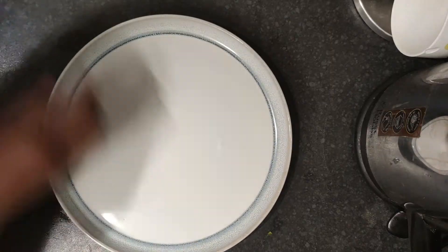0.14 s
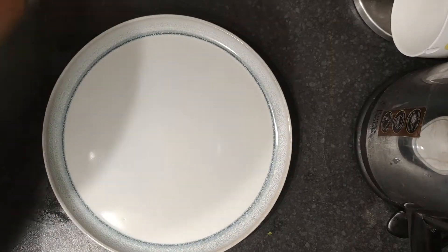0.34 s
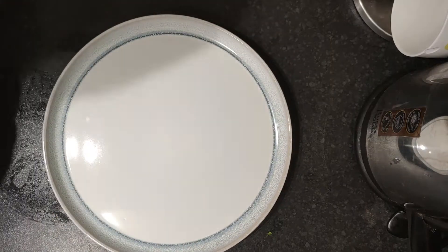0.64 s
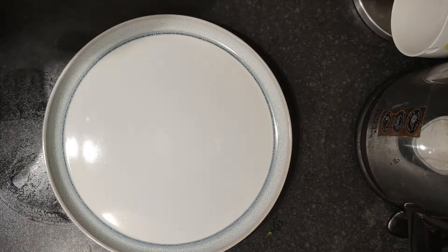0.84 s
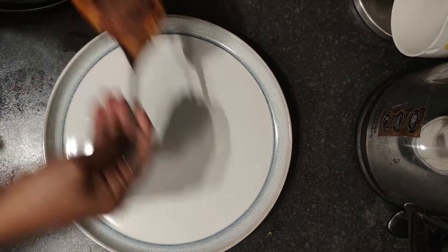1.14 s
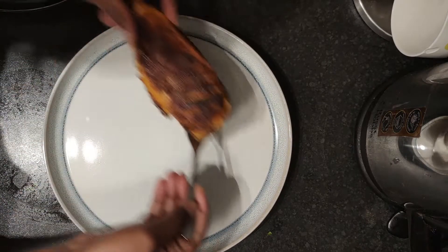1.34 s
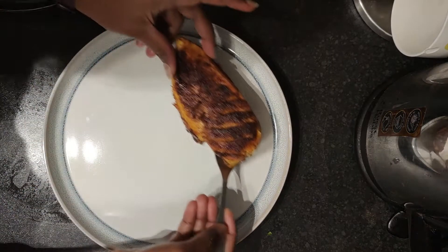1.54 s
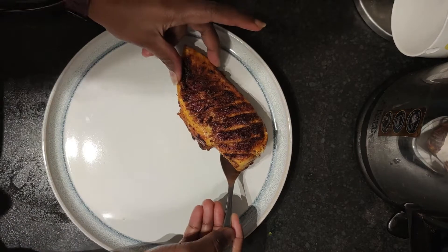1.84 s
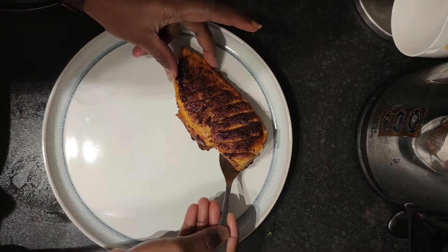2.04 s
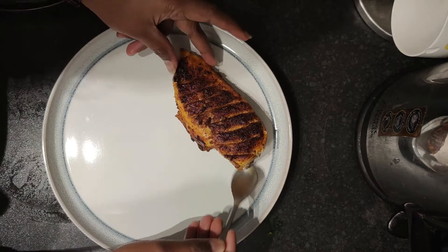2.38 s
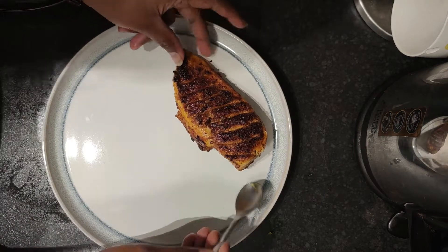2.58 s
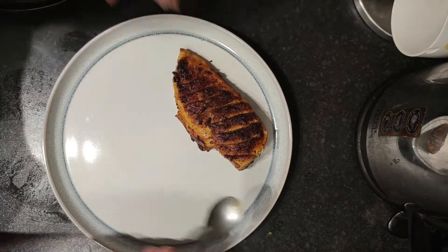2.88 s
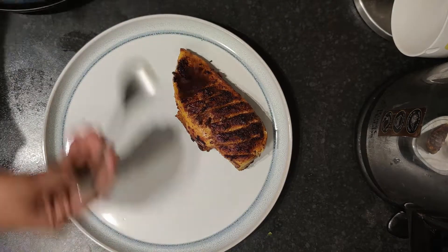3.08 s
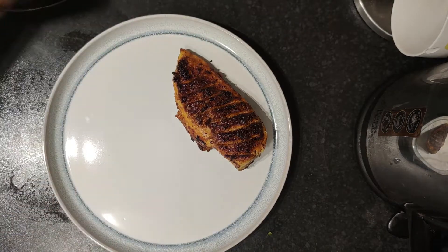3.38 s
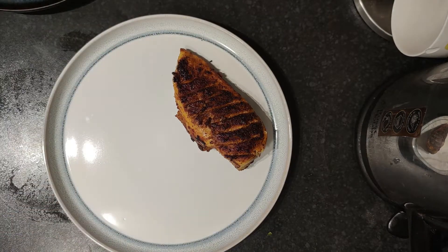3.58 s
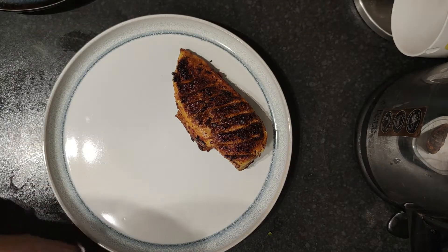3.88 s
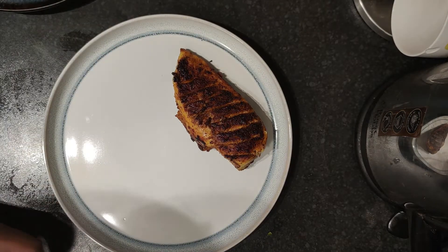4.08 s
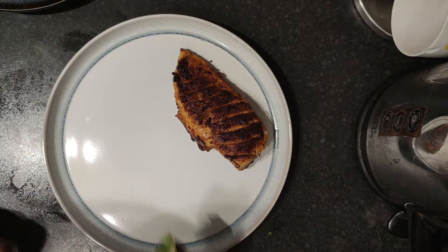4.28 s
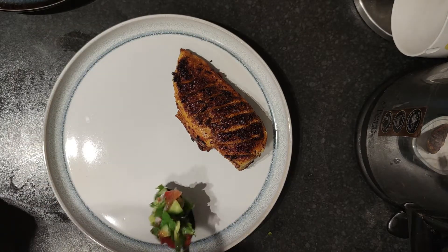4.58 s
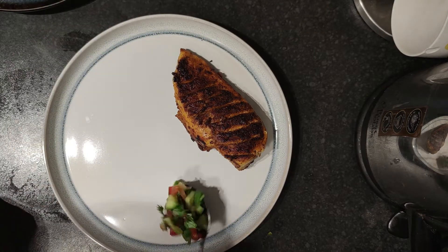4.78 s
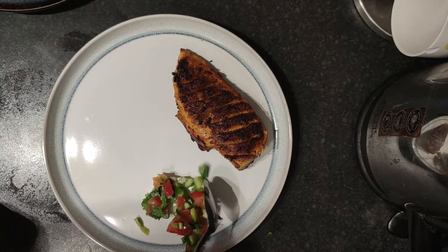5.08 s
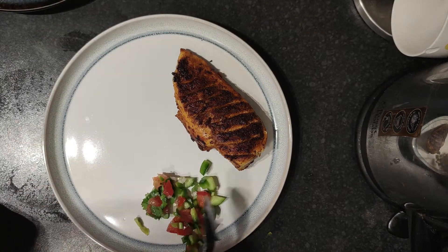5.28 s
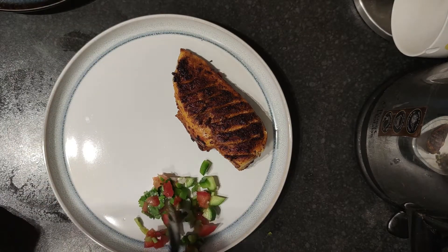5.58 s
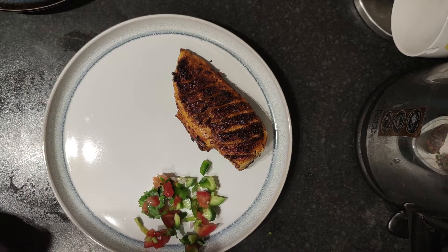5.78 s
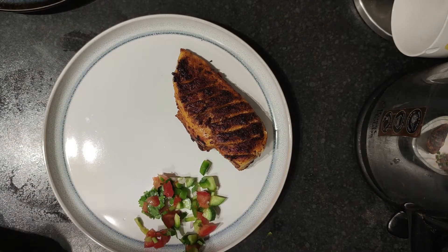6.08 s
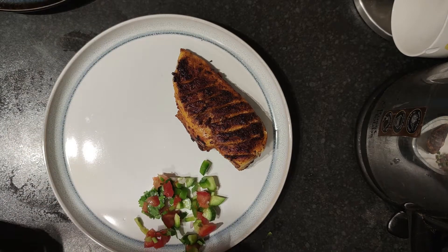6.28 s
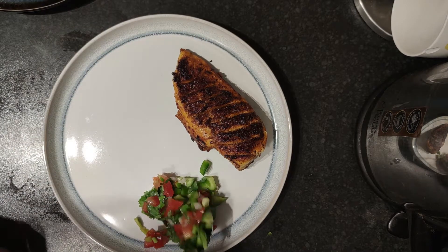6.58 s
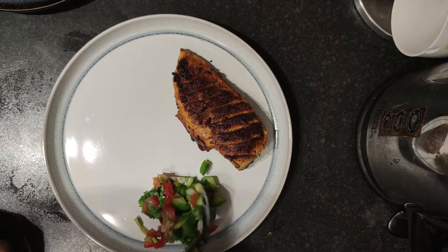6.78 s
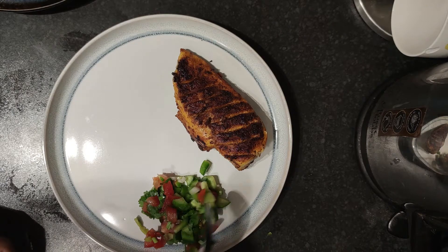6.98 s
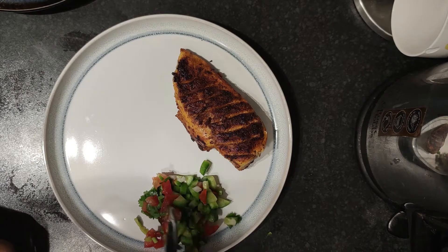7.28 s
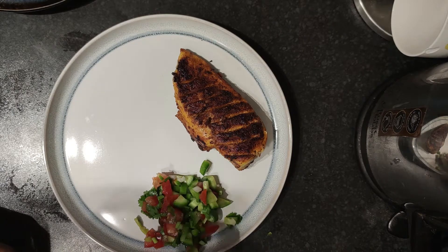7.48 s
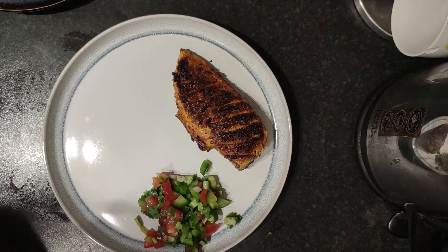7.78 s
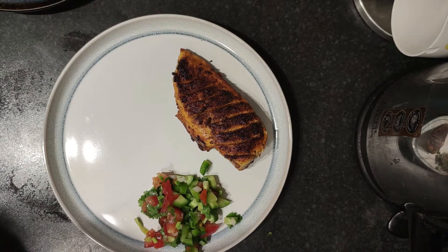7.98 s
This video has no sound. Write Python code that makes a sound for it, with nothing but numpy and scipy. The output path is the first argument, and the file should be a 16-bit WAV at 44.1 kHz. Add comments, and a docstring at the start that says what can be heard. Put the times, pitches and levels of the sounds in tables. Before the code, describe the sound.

A quiet kitchen is heard close up, with a steady low rumble and faint hiss. During the first second, two soft swishes slide across a stone counter, with light knocks and a small squeaky scuff near 0.4 seconds. At 1.8 seconds a spoon clinks clearly on a ceramic plate, slightly to the left, ringing briefly. A tiny touch and a faint scrape follow around 2.3 seconds. At 3.6 seconds a steel utensil is put down with a dull thump and a bright rattling ring that stops short at 3.9. From about 4 to 8 seconds, chopped salad leaves the spoon in faint wet ticks, soft pats and rustles, clearest around 5 to 5.5 and 6.2 seconds, with a few muted spoon touches on the plate. At 8.1 seconds metal tongs clatter with a low thump and a sharp ring, the loudest sound.

```python
"""Soft knocks and the swish of things sliding on a stone counter, close by in a quiet kitchen.
A spoon clinks on a ceramic plate, a steel utensil is put down, chopped salad drops from the spoon
with small wet ticks, and metal tongs clatter. Each impact on ceramic or steel excites a brief crack
and long-ringing modes; sliding makes friction noise. Two microphone ports hear it over a low rumble."""
import sys
import numpy as np
from scipy import signal
from scipy.fft import rfft, irfft, next_fast_len
from scipy.io import wavfile
from scipy.ndimage import uniform_filter1d

SR = 44100
rng = np.random.default_rng(int(sys.argv[2]) if len(sys.argv) > 2 else 0)


def digitize_waveform(pressure):
    """Quantize a signal to 16-bit integers and store it at the path in sys.argv[1].

    Rows of a 2-D input are taken as channels; values are limited to [-1, 1].
    """
    field = np.atleast_2d(pressure).T
    bounded = np.clip(field, -1, 1)
    quanta = np.round(bounded * 32767).astype(np.int16)
    wavfile.write(sys.argv[1], SR, quanta)


N = 358974

# Spectrum of broad friction noise. Each row: frequency in Hz, relative density in dB.
FRICTION_SPECTRUM = [(100, 2), (500, -1), (1800, 2), (3500, 2), (6000, -4), (8500, -1), (11000, -10.5),
                     (15500, -13)]


def plate():
    """Impact excitation: the spoon strikes the ceramic plate, then touches it lightly."""
    # Each row: frequency in Hz, relative level in dB, nominal t60 in seconds.
    modes = [(800, -48, 0.34), (870, -49, 0.31), (1620, -39, 0.25), (2471, -37, 0.31), (2530, -39, 0.3),
             (2870, -38, 0.29), (2950, -43, 0.35), (3709, -39, 0.32), (3800, -43, 0.28), (4240, -37, 0.25),
             (4400, -48, 0.31), (4743, -45, 0.27), (5319, -52, 0.35), (5588, -48, 0.26), (5986, -49, 0.28),
             (6428, -49, 0.28), (6740, -55, 0.33), (7850, -54, 0.26), (8236, -54, 0.27), (8355, -51, 0.33),
             (8520, -59, 0.35), (9152, -54, 0.3), (10400, -54, 0.21), (12100, -55, 0.28)]
    # Each row: start in seconds, strength in dB, share that goes into ringing in dB.
    hits = [(1.8151, 5, -5), (1.8172, 0, -16), (2.231, -34, 3.5)]
    # Each row: frequency in Hz, relative density in dB.
    crack_spectrum = [(100, -20), (550, -18), (850, 11.5), (1250, -12), (2900, 7.5), (4200, 10),
                      (5200, 1.5), (7000, -3), (7900, 7), (9300, -7.5), (12000, -12), (15500, -25)]
    crack = reverberate(cracks(hits, crack_spectrum, level_db=-30, t60=0.028), wet_db=-5.5, pan_db=11.5)
    return crack + ringing(hits, modes, level_db=1, t60_scale=0.94, flutter=1)


def utensil():
    """Rebound: a steel utensil lands, rattles and vibrates freely until its ring breaks off."""
    # Each row: frequency in Hz, relative level in dB, nominal t60 in seconds.
    modes = [(464, -40, 0.41), (1400, -40, 0.4), (1462, -36, 0.35), (1986, -47, 0.44), (2229, -38, 0.41),
             (2275, -36, 0.46), (2353, -30, 0.42), (2385, -30, 0.4), (2445, -34, 0.39), (2814, -50, 0.42),
             (2998, -52, 0.39), (3704, -47, 0.44), (4199, -51, 0.4), (4576, -41, 0.34), (4651, -34, 0.35),
             (4722, -37, 0.39), (4813, -46, 0.37), (5080, -49, 0.38), (6228, -40, 0.37), (6300, -43, 0.36),
             (6460, -44, 0.37), (8080, -47, 0.27), (8689, -61, 0.37), (8920, -49, 0.25), (9200, -48, 0.26),
             (9950, -56, 0.36), (12160, -62, 0.36), (13000, -61, 0.34), (14850, -62, 0.38)]
    # Each row: start in seconds, strength in dB, share that goes into ringing in dB.
    hits = [(3.6411, 6.5, 0), (3.648, -2, -2.5), (3.6545, 9, -18), (3.727, -37, -5)]
    # Each row: frequency in Hz, relative density in dB.
    crack_spectrum = [(50, -21.5), (140, -2), (260, -7), (480, -8.5), (1000, -4), (2300, 1), (3200, -6.5),
                      (4600, 5), (5500, -21), (6300, 5), (7500, -7.5), (8200, -7.5), (11000, -15.5),
                      (15500, -8)]
    crack = reverberate(cracks(hits, crack_spectrum, level_db=-34, t60=0.056), wet_db=-5, pan_db=2.5)
    ring = ringing(hits, modes, level_db=-4.5, t60_scale=0.94, flutter=1)
    stop_s = 3.897
    return (crack + ring) * np.clip((stop_s - np.arange(N) / SR) / 0.0014, 0, 1)


def tongs():
    """Repeated impact: two steel arms clatter, each contact exciting the same modes again."""
    # Each row: frequency in Hz, relative level in dB, t60 in seconds.
    modes = [(1440, -28, 0.33), (1530, -38, 0.4), (1700, -45, 0.29), (2067, -26, 0.28), (2450, -24, 0.17),
             (2560, -33, 0.4), (2800, -39, 0.4), (3472, -39, 0.4), (3740, -30, 0.33), (4245, -32, 0.39),
             (5200, -37, 0.4), (6000, -40, 0.27), (6260, -31, 0.4), (6790, -26, 0.17), (7686, -32, 0.4),
             (7722, -33, 0.4), (8100, -36, 0.13), (8965, -39, 0.4), (9574, -24, 0.09), (10645, -22, 0.09),
             (12790, -35, 0.2), (14180, -40, 0.35), (14650, -28, 0.13)]
    # Each row: start in seconds, strength in dB, share that goes into ringing in dB.
    hits = [(8.0912, 5.5, -19), (8.093, -1, -0.5), (8.0975, -13, -17), (8.1165, -3.5, -12),
            (8.119, 4.5, -28), (8.1375, -12, -8)]
    # Each row: frequency in Hz, relative density in dB.
    crack_spectrum = [(50, -17), (150, -6), (300, -37), (700, -5), (1000, -12.5), (1500, 2.5), (2600, 6),
                      (4000, 9), (4800, 0), (6800, 9.5), (8400, -5), (11000, -16), (15500, 1.5)]
    crack = reverberate(cracks(hits, crack_spectrum, level_db=-24, t60=0.072), wet_db=-6.5, pan_db=6.5)
    return crack + ringing(hits, modes, level_db=0, t60_scale=1, flutter=0.45)


def cracks(hits, spectrum, level_db, t60):
    """Modal overlap: the dense, fast-dying modes of each contact merge into a burst of noise."""
    out, t = np.zeros((2, N)), np.arange(SR // 5) / SR
    attack = 1 - np.exp(-t / 0.0003)
    for start, strength_db, _ in hits:
        burst = at_ports(np.array([noise(spectrum, len(t)) for port in range(2)]))
        add(out, start, gain_of(strength_db + level_db) * attack * decay(t, t60) * burst)
    return out


def ringing(hits, modes, level_db, t60_scale, flutter):
    """Free vibration: each contact adds energy to the long modes, and reflections make them flutter."""
    out, start = np.zeros((2, N)), hits[0][0]
    t = np.arange(start, hits[-1][0] + 0.35, 1 / SR)
    for hz, db, t60 in modes:
        energy = np.zeros(len(t))
        for hit_s, strength_db, share_db in hits:
            envelope = (t > hit_s) * decay(abs(t - hit_s), t60 * t60_scale)
            energy += (gain_of(strength_db + share_db) * envelope) ** 2
        amplitude = np.sqrt(np.maximum(uniform_filter1d(energy, 16), 0))
        # The reflections sum to a slowly wandering complex gain at each port.
        real, imag = unit_rms(uniform_filter1d(rng.standard_normal((2, 2, SR)), 900))[..., :len(t)]
        paths = (1 + flutter * (real + 1j * imag)) / np.sqrt(1 + 2 * flutter ** 2)
        cycles = hz * (t - start) + rng.random((2, 1))  # each port has its own phase
        add(out, start, gain_of(db + level_db) * amplitude * (paths * np.exp(2j * np.pi * cycles)).real)
    return out


def thumps():
    """Structure-borne sound: dull, low blows travel through the counter."""
    # Each row: start in seconds, level in dB, pitch in Hz, t60 in seconds.
    blows = [(0.008, -54, 223, 0.4), (1.011, -50, 190, 0.077), (1.816, -50.5, 234, 0.065),
             (3.644, -41.5, 125, 0.064), (4.832, -53.5, 113, 0.12), (5.058, -50, 126, 0.081),
             (8.101, -39.5, 155, 0.092)]
    out = np.zeros(N)
    for start, db, hz, t60 in blows:
        add(out, start, blow(db, hz, 0.92 * hz, t60))
    return out


def clacks():
    """Damped resonance: hollow clacks, and a small click where the utensil's ring breaks off."""
    # Each row: start in seconds, level in dB, pitch in Hz, relative octave level in dB, t60 in seconds.
    bursts = [(0.002, -51.5, 940, -3.5, 0.17), (0.066, -51.5, 1900, -7.5, 0.034),
              (0.725, -53.5, 714, 2.5, 0.12), (1.04, -52, 480, -9, 0.07), (2.231, -58.5, 845, -2.5, 0.08),
              (3.651, -41, 470, -2, 0.055), (3.836, -61, 457, -18, 0.11), (3.89, -51, 1330, -2, 0.017),
              (8.097, -52, 720, -6, 0.34)]
    out = np.zeros(N)
    for start, db, hz, octave_db, t60 in bursts:
        for note_hz, note_db in ((hz, db), (2 * hz, db + octave_db)):
            add(out, start, blow(note_db, note_hz, 0.45 * note_hz, t60))
    return out


def spoon_touches():
    """Damped resonance: the loaded spoon touches the plate with one short note."""
    # Each row: start in seconds, level in dB.
    touches = [(5.028, -65), (5.056, -56), (7.332, -65.5)]
    out = np.zeros(N)
    for start, db in touches:
        add(out, start, blow(db, hz=983, width_hz=39, t60=0.073))
    return out


def salad_flops():
    """Inelastic impact: salad lands on the plate with a low pat and a broadband splat."""
    # Each row: start in seconds, pat level in dB, splat level in dB.
    landings = [(5.323, -63, -71), (6.175, -55, -59), (6.259, -64, -50.5), (6.314, -62, -74),
                (7.332, -64, -82)]
    out = np.zeros(N)
    for start, pat_db, splat_db in landings:
        add(out, start, blow(pat_db, hz=503, width_hz=480, t60=0.059))
        add(out, start, blow(splat_db, hz=3000, width_hz=6400, t60=0.037))
    return out


def wet_ticks(faint_db=-68):
    """Brief transients are broadband: wet food leaves the spoon in clear snaps and faint random ones."""
    # Each row: start in seconds, level in dB.
    clear = [(2.534, -63), (5.056, -51.5), (5.323, -57), (5.47, -54), (6.135, -55.5), (6.259, -53.5),
             (7.799, -61), (7.962, -59)]
    # Each row: frequency in Hz, relative density in dB.
    spectrum = [(500, -42), (1500, -8), (4000, -14), (6500, -5), (8500, 1), (12000, -12), (15500, -1)]
    out, t = np.zeros(N), np.arange(SR // 8) / SR
    faint = [(start, faint_db) for start in rng.uniform(4.1, 7.0, size=6)]  # while salad is served
    for start, db in clear + faint:
        add(out, start, gain_of(db) * decay(t, t60=0.024) * noise(spectrum, len(t)))
    return out


def scuff():
    """Stick-slip friction: something scuffs the counter with grit and a short falling squeak."""
    # Each row: start in seconds, hold in seconds, level in dB.
    strokes = [(0.394, 0.027, -54.5)]
    # Each row: frequency in Hz, relative density in dB.
    grit_spectrum = [(200, -15), (900, -10), (1200, -1), (1420, 3), (1800, -11), (2250, -12), (2800, -8),
                     (3500, -28), (6000, -39), (15000, -34)]
    # Each row: frequency in Hz, bandwidth in Hz, relative level in dB.
    squeak_modes = [(1520, 250, 2), (2900, 460, -4.5)]
    out = np.zeros(N)
    for row in strokes:
        out += rub(stroke(*row, attack_s=0.04, release_s=0.23), grit_spectrum, grain_db=3)
        out += sing(stroke(*row, attack_s=0.04, release_s=0.07), squeak_modes, fall_hz_per_s=3000)
    return out


def serving():
    """Sliding friction: the spoon sings as it is drawn from under the food; salad slides and rustles."""
    # Each row: frequency in Hz, bandwidth in Hz, relative level in dB.
    spoon_modes = [(2620, 200, 0.5), (4230, 130, -7.5), (8130, 680, -8)]
    slide_modes = [(550, 140, 0)]
    # Each row: start in seconds, hold in seconds, level in dB.
    scrapes = [(2.322, 0.03, -66.5)]
    slides = [(6.95, 0.088, -75)]
    rustles = [(5.045, 0.018, -70), (6.15, 0.058, -69), (6.265, 0.055, -69), (6.855, 0.035, -75),
               (7.24, 0.013, -78), (7.79, 0.25, -77.5)]
    out = np.zeros(N)
    for row in scrapes:
        out += sing(stroke(*row, attack_s=0.06, release_s=0.14), spoon_modes)
    for row in slides:
        out += sing(stroke(*row, attack_s=0.55, release_s=0.55), slide_modes)
    for row in rustles:
        out += rub(stroke(*row, attack_s=0.03, release_s=0.046), FRICTION_SPECTRUM, grain_db=3)
    return out


def swishes(level_db):
    """Smooth friction: two long slides across the counter reach the ports uncorrelated."""
    # One curve for each slide. Each point: time in seconds, relative level in dB.
    curves = [
        [(0.15, -80), (0.354, -71), (0.406, -64), (0.45, -70), (0.472, -61.5), (0.53, -70.5), (0.68, -80)],
        [(0.7, -69), (0.714, -73), (0.78, -61.5), (0.852, -64), (0.976, -59.5), (1.058, -64.5), (1.075, -88)],
    ]
    ports = [sum(rub(curve, FRICTION_SPECTRUM, grain_db=1.5) for curve in curves) for port in range(2)]
    return gain_of(level_db) * np.array(ports)


def blow(db, hz, width_hz, t60):
    """Impulse response: one well-damped band of noise rises quickly and dies away."""
    t = np.arange(SR // 3) / SR
    envelope = decay(t, t60) * (1 - np.exp(-t / 0.0011))
    burst = unit_rms(resonance(hz, width_hz, len(t)) * envelope)
    return gain_of(db) * np.sqrt(np.mean(envelope ** 2)) * burst


def rub(curve, spectrum, grain_db):
    """Stick-slip modulation: the level of friction noise jumps as the surfaces catch and slip."""
    times, db = np.transpose(curve)
    out, t = np.zeros(N), np.arange(times[0], times[-1], 1 / SR)
    catch = unit_rms(uniform_filter1d(rng.standard_normal(len(t)), 128))
    grit = unit_rms(gain_of(grain_db * catch)) * noise(spectrum, next_fast_len(len(t), True))[:len(t)]
    add(out, times[0], gain_of(np.interp(t, times, db)) * grit)
    return out


def sing(curve, modes, fall_hz_per_s=0):
    """Forced vibration: light friction keeps a few resonances sounding; their pitch may fall."""
    times, db = np.transpose(curve)
    out, t = np.zeros(N), np.arange(0, times[-1] - times[0], 1 / SR)
    size = next_fast_len(len(t), True)
    steady = sum(gain_of(level) * resonance(hz, width_hz, size) for hz, width_hz, level in modes)
    shifted = (signal.hilbert(steady)[:len(t)] * np.exp(-1j * np.pi * fall_hz_per_s * t ** 2)).real
    add(out, times[0], gain_of(np.interp(times[0] + t, times, db)) * shifted)
    return out


def stroke(start, hold_s, db, attack_s, release_s):
    """Envelope of one stroke: up by 40 dB ahead of its start, held, and down again."""
    end = start + hold_s
    return [(start - attack_s, db - 40), (start, db), (end, db), (end + release_s, db - 40)]


def reverberate(sound, wet_db, pan_db):
    """Reverberation: counter and wall reflections follow the direct sound, each band with its own decay."""
    # Each row: frequency in Hz, t60 in seconds.
    decay_times = [(150, 0.29), (1000, 0.43), (3000, 0.47), (6000, 0.41), (9000, 0.33), (15000, 0.23)]
    shape = (2, SR // 2)
    reflections = at_ports(rng.standard_normal(shape) * (rng.random(shape) < 0.1))
    hz, t, bands = signal.stft(reflections, SR, nperseg=256)
    tail = signal.istft(bands * decay(t, lookup(decay_times, hz)[:, None]), SR, nperseg=256)[1]
    tail *= np.clip(np.arange(tail.shape[1]) / SR / 0.00093 - 1, 0, 1)  # gap before the first reflection
    tail /= np.linalg.norm(tail, axis=1, keepdims=True)
    stereo = sound * np.ones((2, 1))
    direct = stereo * gain_of([[pan_db / 2], [-pan_db / 2]])
    return direct + gain_of(wet_db) * signal.fftconvolve(stereo, tail, axes=1)[:, :N]


def room_tone(level_db, pan_db):
    """Ambient noise: the room's air gives a steady low rumble."""
    # Each row: frequency in Hz, relative density in dB.
    spectrum = [(20, -7.5), (45, -2.5), (85, -1.5), (160, -3.5), (300, -9), (600, -12), (1000, -14),
                (2000, -18.5), (4000, -22.5), (6500, -30.5), (8500, -29), (11000, -34.5), (15500, -41.5)]
    air = at_ports(np.array([noise(spectrum, next_fast_len(N, True)) for port in range(2)]))
    return gain_of([[level_db + pan_db / 2], [level_db - pan_db / 2]]) * air[:, :N]


def at_ports(pair, lag_s=0.00039):
    """Partial coherence: two unrelated sounds gain a common part, which reaches the right port later."""
    # Each row: frequency in Hz, left-right correlation from 0 to 1.
    correlation = [(30, 0.14), (100, 0.29), (250, 0.25), (600, 0.24), (1500, 0.16), (5000, 0.087)]
    size = next_fast_len(pair.shape[1], True)
    hz = np.fft.rfftfreq(size, 1 / SR)
    left, unrelated = rfft(pair, size)
    common = lookup(correlation, hz)
    right = common * left * np.exp(-2j * np.pi * hz * lag_s) + np.sqrt(1 - common ** 2) * unrelated
    return irfft(np.array([left, right]), size)[:, :pair.shape[1]]


def port_filter(sound, response, size=2048):
    """Minimum-phase filtering: the Hilbert transform of the log gain gives a causal response."""
    log_gain = np.log(gain_of(lookup(response, abs(np.fft.fftfreq(size, 1 / SR)))))
    taps = np.fft.ifft(np.exp(np.conj(signal.hilbert(log_gain)))).real
    return signal.oaconvolve(sound, taps[:size // 2])[:N]


def resonance(centre_hz, width_hz, size):
    """Resonant filtering: noise of rms 1 under one Lorentzian peak."""
    detuning = 2 * (np.fft.rfftfreq(size, 1 / SR) - centre_hz) / width_hz
    return unit_rms(irfft(rfft(rng.standard_normal(size)) / (1 + detuning ** 2), size))


def noise(spectrum, size):
    """Spectral shaping: noise of rms 1 with the given spectrum."""
    hz = np.fft.rfftfreq(size, 1 / SR)
    return unit_rms(irfft(rfft(rng.standard_normal(size)) * gain_of(lookup(spectrum, hz)), size))


def decay(t, t60):
    """Exponential damping, 60 dB down at t60."""
    return np.exp(-np.log(1000) * t / t60)


def gain_of(db):
    """Amplitude ratio of a level in decibels."""
    return 10 ** (np.asarray(db) / 20)


def unit_rms(x):
    """Normalisation to rms 1."""
    return x / np.sqrt(np.mean(x ** 2) + 1e-20)


def lookup(table, hz):
    """Interpolation on a log-frequency axis."""
    frequencies, values = np.transpose(table)
    return np.interp(np.log(hz + 1), np.log(frequencies + 1), values)


def add(mix, start, sound):
    """Superposition: a sound joins the mix at its start in seconds."""
    part = mix[..., max(round(start * SR), 0):][..., :sound.shape[-1]]
    part += sound[..., :part.shape[-1]]


def scene():
    """Superposition of three clinking things, softer noises and the room."""
    clinks = plate() + utensil() + tongs()
    soft = scuff() + serving() + wet_ticks() + thumps() + clacks() + spoon_touches() + salad_flops()
    soft = reverberate(soft, wet_db=-3.5, pan_db=4)
    return clinks + soft + swishes(level_db=6) + room_tone(level_db=-64.5, pan_db=0.5)


def record(dry, hiss_db=-78, cutoff_hz=15800):
    """Microphone response: each port colours the sound, faint hiss joins it, and the band is limited."""
    # The left port resonates in the treble, the right is muffled. Each row: frequency in Hz, gain in dB.
    left_port = [(100, 1), (1500, -2), (5000, -3.5), (6500, -4.5), (7300, -2.5), (8300, 9.5), (9300, 5),
                 (11000, 3), (13000, 1), (16000, -6)]
    right_port = [(100, 2.5), (1500, -2), (5000, -1.5), (6300, 2), (7000, -2), (8000, -25.5),
                  (10000, -12.5), (13000, 0.5), (16000, -29)]
    # Each row: frequency in Hz, relative density in dB.
    hiss_spectrum = [(100, -4), (5000, -13), (8000, -5.5), (11000, -4.5), (13500, 2), (15700, -1)]
    coloured = np.array([port_filter(dry[0], left_port), port_filter(dry[1], right_port)])
    hiss = gain_of(hiss_db) * np.array([noise(hiss_spectrum, next_fast_len(N))[:N] for port in range(2)])
    low_pass = signal.firwin(511, cutoff_hz, window=("kaiser", 9), fs=SR)
    return signal.oaconvolve(coloured + hiss, low_pass[None], "same", axes=1)


dry = scene()
out = record(dry)
digitize_waveform(out)
```